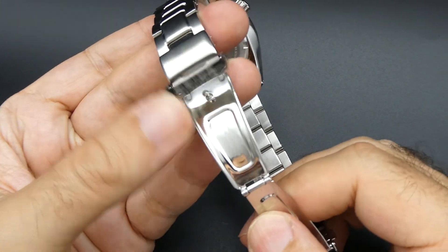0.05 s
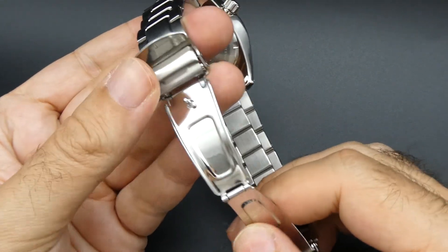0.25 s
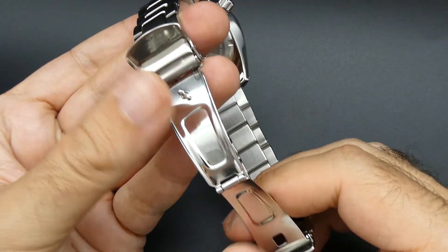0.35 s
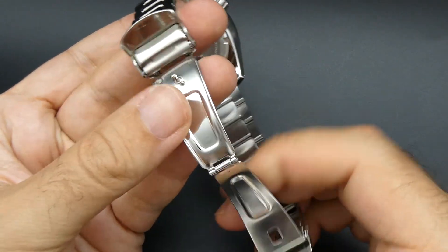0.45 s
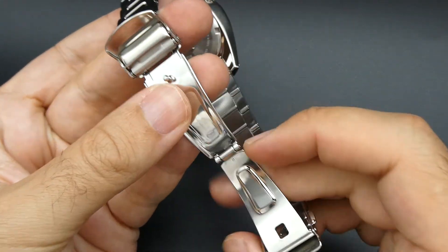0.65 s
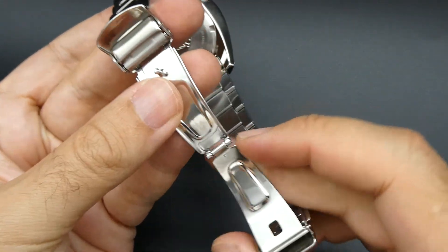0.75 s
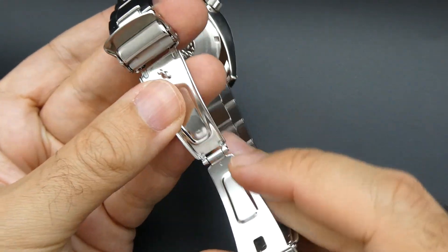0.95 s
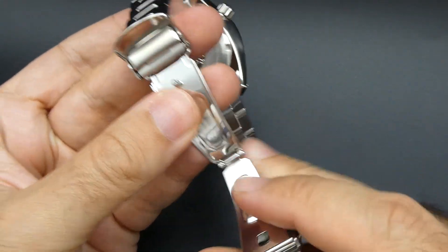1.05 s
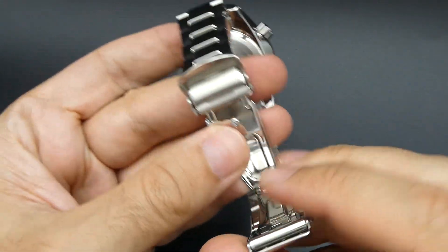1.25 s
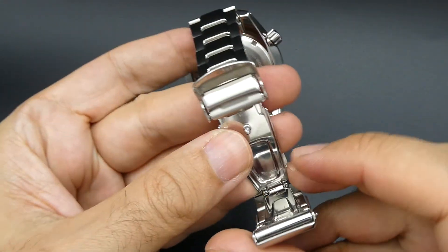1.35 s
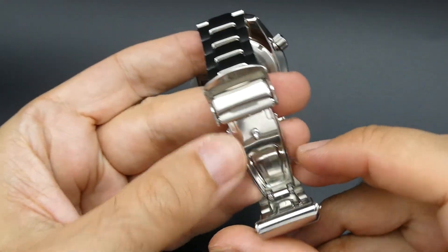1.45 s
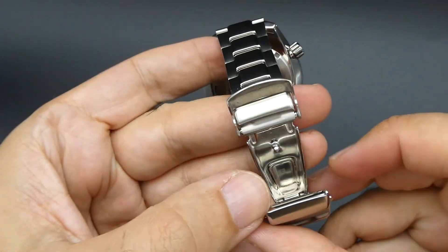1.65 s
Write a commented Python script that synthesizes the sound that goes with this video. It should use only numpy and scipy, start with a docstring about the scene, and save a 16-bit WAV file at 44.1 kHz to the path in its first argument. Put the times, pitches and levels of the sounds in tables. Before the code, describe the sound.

A steel watch clasp snaps open and its loose links tick lightly. Then come sharper snaps and a soft, dull knock of the hands as it folds shut, heard up close over a quiet room's low rumble.

```python
"""A steel watch bracelet is handled close by, over a desk, against the low rumble of a quiet room.
First the safety lock flips up with a snap; loose links tick and slide, and the fingers bump softly.
Near one second the catch snaps, the hands give a dull knock, and the folding blades strike together.
The hinge clicks twice and a few last ticks follow. Each steel contact is a brief chatter that
excites the modes of one part; hands, desk and room reflect the sound."""
import sys
import numpy as np
from scipy import signal
from scipy.fft import rfft, irfft
from scipy.io import wavfile

SR = 44100
rng = np.random.default_rng(int(sys.argv[2]) if len(sys.argv) > 2 else 0)


def to_wav(sig):
    """Store sig (one row per channel, or 1-D mono) as 16-bit WAV at the path in sys.argv[1].

    Samples outside -1..1 are clipped; the rate is SR.
    """
    pcm = np.clip(np.atleast_2d(sig), -1, 1) * 32767
    pcm = np.round(pcm).astype(np.int16)
    wavfile.write(sys.argv[1], SR, pcm.T)  # frames by channels


N = 74970
TOP_HZ = 15800
# Four broad bands that set the timbre of a click: centre_hz
BAND_HZ = (2700, 6200, 10000, 14200)


def undb(db):
    """Amplitude ratio of a level in decibels."""
    return 10 ** (np.asarray(db) / 20)


def unit(x):
    """Normalisation to unit energy."""
    return x / np.sqrt(np.sum(x ** 2) + 1e-18)


def fade(t, t60):
    """Exponential damping by 60 dB in t60 seconds."""
    return np.exp(-np.log(1000) * t / max(t60, 1e-4))


def swell(t, rise_s, t60):
    """Transient envelope: linear attack, then exponential decay."""
    return np.minimum(t / rise_s, 1) * fade(np.maximum(t - rise_s, 0), t60)


def add(out, start_s, x):
    """Superposition of a sound from its onset."""
    i = int(round(start_s * SR))
    out[:, i:i + x.shape[-1]] += x[..., :N - i]


def stereo(mid, side):
    """Sum and difference: mid is in phase in both channels, side in antiphase."""
    return np.array([mid + side, mid - side])


def highpass(x, hz, order=2):
    """High-pass filtering attenuates what lies below hz."""
    return signal.sosfilt(signal.butter(order, min(hz, .45 * SR), "high", fs=SR, output="sos"), x)


def noise(points, size):
    """Spectral shaping of white noise by (frequency_hz, density_db) points, at unit rms."""
    hz, db = np.array(points, float).T
    f = np.maximum(np.fft.rfftfreq(size, 1 / SR), 1)
    gain = undb(np.interp(np.log(f), np.log(hz), db))
    x = irfft(rfft(rng.standard_normal(size)) * gain, size)
    return x / x.std()


def equalise(x, band_db, lowest_hz):
    """Equalisation draws the mean power in each broad band toward band_db."""
    spectrum, f = rfft(x), np.fft.rfftfreq(len(x), 1 / SR)
    in_range = (f > lowest_hz) * (f < TOP_HZ)
    weights = [np.interp(f, BAND_HZ, row) ** 2 * in_range for row in np.eye(len(BAND_HZ))]
    now_db = [10 * np.log10(np.average(abs(spectrum) ** 2, weights=w)) for w in weights]
    gain = undb(np.interp(f, BAND_HZ, np.array(band_db) - now_db))
    return irfft(spectrum * gain, len(x))


def room_tone():
    """A diffuse field of rumble and hiss, with narrow-band noise heard as a wavering hum."""
    # Room noise in phase in both channels: frequency_hz, density_db
    mid_spectrum = [(15, -58), (25, -40.5), (84, -18.5), (153, -6), (256, -11.5), (285, -12), (373, -18),
                    (405, -18), (575, -22), (818, -25.5), (887, -25), (1740, -30), (2110, -28.5),
                    (3520, -33), (9570, -31.5), (14800, -38), (16000, -64)]
    # Room noise in antiphase: frequency_hz, density_db
    side_spectrum = [(15, -64), (25, 1), (70, -31), (97, -7), (149, -7.5), (236, -2.5), (317, -5.5),
                     (451, -5), (503, -9.5), (624, -10), (677, -12.5), (1160, -17), (1290, -20.5),
                     (13600, -43), (16000, -54)]
    hum_band = signal.butter(1, [148.5, 166.1], "band", fs=SR, output="sos")
    hum = signal.sosfilt(hum_band, rng.standard_normal(N))
    mid = undb(-61.5) * noise(mid_spectrum, N) + undb(-64) * hum / hum.std()
    return stereo(mid, undb(-55) * noise(side_spectrum, N))


def hand_bumps(size=16000):
    """Soft impacts give damped low tones; the heaviest adds a knock that reverberates."""
    # Dull bumps of the hands: start_s, level_db, pitch_hz, rise_s, t60_s
    bumps = [(0.086, -41, 193, 0.0059, 0.01), (0.344, -47.5, 288, 0.0076, 0.072),
             (1.0304, -38, 232.3, 0.00345, 0.046), (1.059, -46.5, 226, 0.0024, 0.025)]
    # The soft knock: frequency_hz, density_db
    knock_spectrum = [(100, -3.5), (250, 0), (450, -13.5), (700, -6.5), (900, -18), (1200, -6),
                      (1600, -15.5), (2600, -17.5), (5000, -25.5), (15000, -28)]
    out, t = np.zeros((2, N)), np.arange(size) / SR
    for start_s, level_db, pitch_hz, rise_s, t60 in bumps:
        add(out, start_s, undb(level_db) * swell(t, rise_s, t60) * np.sin(2 * np.pi * pitch_hz * t))
    diffuse = np.array([noise(knock_spectrum, size), noise(knock_spectrum, size)])
    tail = undb(-49) * diffuse * swell(t, rise_s=.001, t60=.34)
    knock = undb(-42) * noise(knock_spectrum, size) * swell(t, rise_s=.001, t60=.04)
    add(out, start_s=1.029, x=knock + tail)
    return highpass(out, hz=109, order=3)


def link_slides(grain_s=.002, spread_db=4, side_db=-5.5):
    """Sliding friction of the links gives a faint, gritty noise that swells and fades."""
    # Links sliding under the fingers: start_s, length_s, level_db
    slides = [(0.427, .14, -65.5), (1.115, .09, -60)]
    # Friction noise of steel: frequency_hz, density_db
    spectrum = [(1500, -27), (4000, -16), (5500, 0), (7500, -5), (9500, 1.5), (12000, -4), (15500, -6)]
    out, t = np.zeros((2, N)), np.arange(N // 4) / SR
    for start_s, length_s, level_db in slides:
        grain_db = spread_db * np.interp(t / grain_s, np.arange(len(t)), rng.standard_normal(len(t)))
        envelope = undb(level_db + grain_db) * np.sin(np.pi * np.minimum(t / length_s, 1))
        friction = stereo(noise(spectrum, len(t)), undb(side_db) * noise(spectrum, len(t)))
        add(out, start_s, envelope * friction)
    return out


def reflections(x, gap_s, side_db=-6):
    """Convolution with early reflections from hands and desk and the room's faint reverberation."""
    t = np.arange(len(x)) / SR
    arrived = t > gap_s
    early = undb(-4) * unit(arrived * fade(t, t60=.039))
    late = undb(-11) * unit(arrived * fade(t, t60=.22))
    mid, side = rng.standard_normal((2, len(x))) * np.hypot(early, late)
    response = stereo(mid, undb(side_db) * side)
    return signal.fftconvolve(response, x[None], axes=1)[:, :len(x)]


def steel_ring(part, t):
    """Free vibration of a steel part is a sum of damped normal modes."""
    # Modes of each steel part: frequency_hz, level_db, t60_s
    modes = {"lock": [(6030, -9, 0.016), (6830, -13, 0.034), (8280, -5, 0.017), (8950, -12.5, 0.046),
             (9770, -14, 0.048), (10710, 7, 0.012), (10944, -18, .04), (12100, 5, 0.0076),
             (14200, 9, 0.011), (15500, -6, 0.0083)], "catch": [(2564, -3.5, 0.01), (3440, -1.5, 0.015),
             (4985, -8.5, 0.039), (5510, -3, 0.026), (5950, -6, 0.03), (8800, -1, 0.011), (10300, 2, 0.01),
             (11140, -3.5, 0.017), (12040, -6, 0.029), (14700, -7, 0.016)], "blades": [(2734, -6, 0.015),
             (5170, -10, 0.035), (5595, -3.5, 0.031), (6200, 0, .01), (7090, -2, 0.011), (9500, -18, 0.062),
             (9850, -4, 0.018), (13900, -19, 0.0088)], "hinge": [(5925, -10, 0.047), (6390, 4, 0.013),
             (7180, -13, 0.04), (8950, -9, .02), (14200, -5, .018), (14900, 1, .012)]}
    phases = rng.uniform(0, 2 * np.pi, len(modes[part]))
    return unit(sum(undb(db) * fade(t, t60) * np.sin(2 * np.pi * hz * t + phase)
                    for (hz, db, t60), phase in zip(modes[part], phases)))


def click(part, band_db, chatter_s, lowest_hz, room_db, release_s=.00047, gap_s=.0012, size=12000):
    """Impact excitation: a blow and its chatter ring one part, heard directly and by reflection."""
    t = np.arange(size) / SR
    impulse, first_half = 1. * (t == 0), t < t[-1] / 2
    chatter = unit(rng.standard_normal(size) * np.exp(-np.maximum(t - chatter_s, 0) / release_s))
    crack = unit(highpass(undb(-5.5) * impulse + chatter, lowest_hz, order=3))
    steel = unit(steel_ring(part, t) * np.minimum(2 * t / chatter_s, 1))
    direct = equalise(crack + undb(-2) * steel, band_db, lowest_hz) * first_half
    # Treble of the direct sound spreads slightly apart between left and right.
    paths = unit(rng.standard_normal(size) * swell(t, gap_s, t60=.0036))
    treble_side = undb(-5.5) * highpass(signal.fftconvolve(direct, paths)[:size], hz=12200)
    # Summed over all directions, the spectrum that reaches the room is smoother.
    smooth_crack = unit(highpass(impulse, lowest_hz, order=3))
    radiated = equalise(smooth_crack + undb(-4.5) * steel, band_db, lowest_hz) * first_half
    return direct + stereo(0, treble_side) + undb(room_db) * reflections(radiated, gap_s)


def link_ticks(timbre_db=(-18, -5, 1, -10.5)):
    """Light impacts of loose links weakly excite the modes of the clasp."""
    # Link contacts: start_s, part, level_db, dullness_db (gain of the two lower bands)
    ticks = [(0.2695, "lock", -32, -9), (0.3166, "lock", -21, -8), (0.3956, "lock", -33, -5),
             (0.4292, "catch", -26.5, -4), (0.4975, "blades", -37, -2), (0.5011, "catch", -27.5, -2),
             (0.5593, "catch", -34, 5), (0.8736, "hinge", -19.5, -4), (0.9783, "blades", -23, -2),
             (0.9951, "blades", -38, 3), (1.122, "blades", -25, 3), (1.237, "hinge", -21, 2.5),
             (1.3864, "hinge", -25.5, -0.5)]
    out = np.zeros((2, N))
    lower_bands = np.array(BAND_HZ) < np.mean(BAND_HZ)
    for start_s, part, level_db, dullness_db in ticks:
        band_db = level_db + np.array(timbre_db) + dullness_db * lower_bands
        add(out, start_s, click(part, band_db, chatter_s=.00067, lowest_hz=2500, room_db=-3.5))
    return out


def clasp_snaps():
    """Short, hard impacts of lock, catch, blades and hinge give broadband excitation."""
    # Clasp contacts, with a level for each band of BAND_HZ:
    # start_s, part, body_db, ring_db, bright_db, top_db, chatter_s, lowest_hz, room_db
    snaps = [(0.2042, "lock", -28, -3.5, 2.5, -3.5, 0.0029, 1440, -8.5),
             (0.4568, "lock", -42, -20, -8.5, -24.5, 0.00057, 1450, 1),
             (0.9313, "catch", -13, -10.5, -4, -8, 0.0018, 1970, -5),
             (1.1304, "blades", -10.5, -4.5, -5, -7.5, 0.00098, 1380, -2),
             (1.1630, "hinge", -29.5, 2, -6, -22, .0016, 1010, -11),
             (1.1689, "hinge", -28.5, -20, -13.5, -11, 0.0022, 1510, 0.5)]
    out = np.zeros((2, N))
    for start_s, part, *band_db, chatter_s, lowest_hz, room_db in snaps:
        add(out, start_s, click(part, band_db, chatter_s, lowest_hz, room_db))
    return out


def scene():
    """Linear superposition of room tone, hands, clasp and links."""
    return room_tone() + hand_bumps() + clasp_snaps() + link_ticks() + link_slides()


def record(dry):
    """Band limiting: a steep low-pass filter cuts the treble above TOP_HZ."""
    return signal.sosfilt(signal.ellip(8, .2, 70, TOP_HZ, fs=SR, output="sos"), dry)


dry = scene()
out = record(dry)
to_wav(out)
```